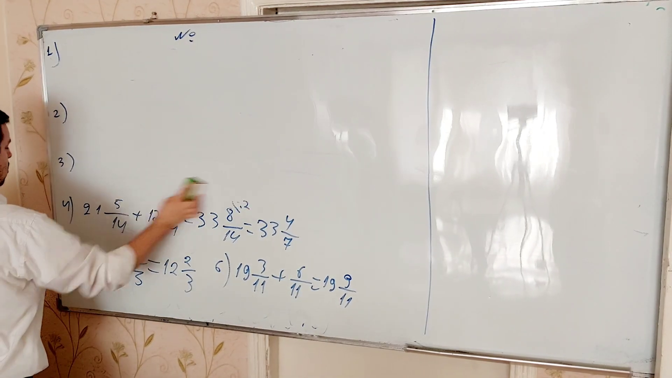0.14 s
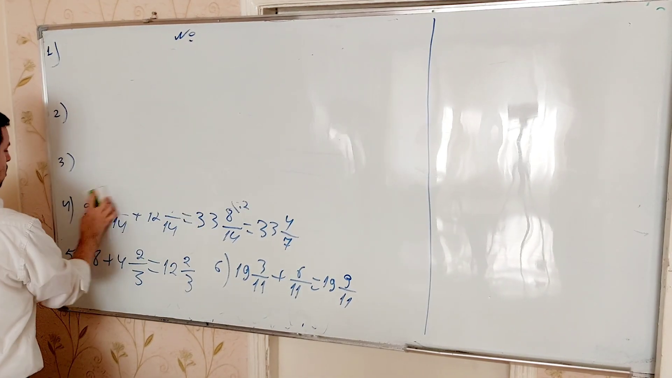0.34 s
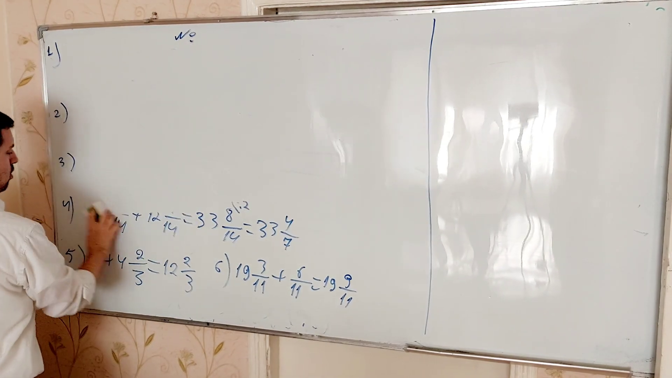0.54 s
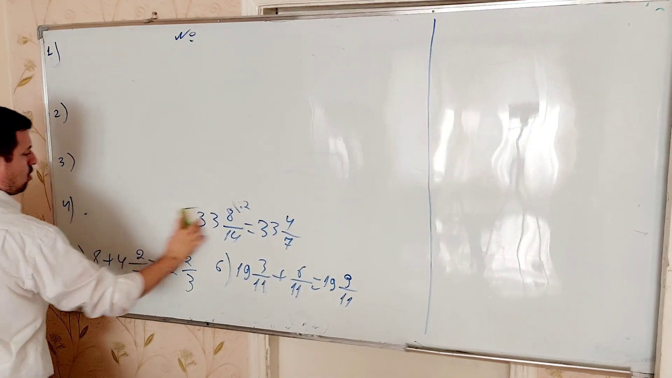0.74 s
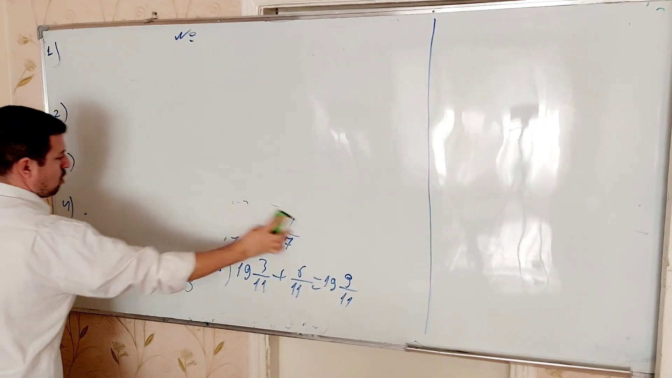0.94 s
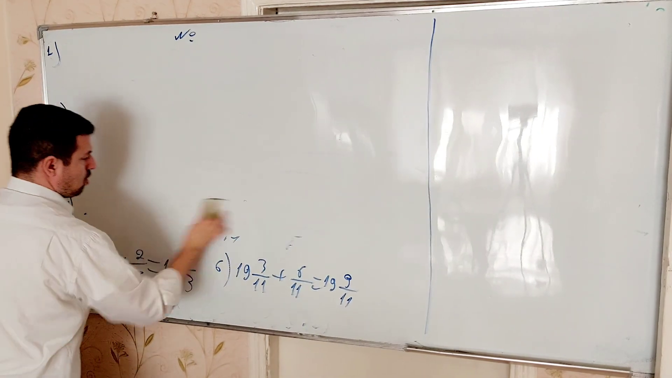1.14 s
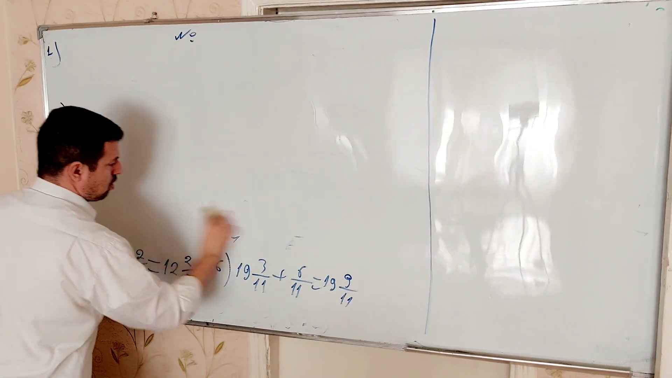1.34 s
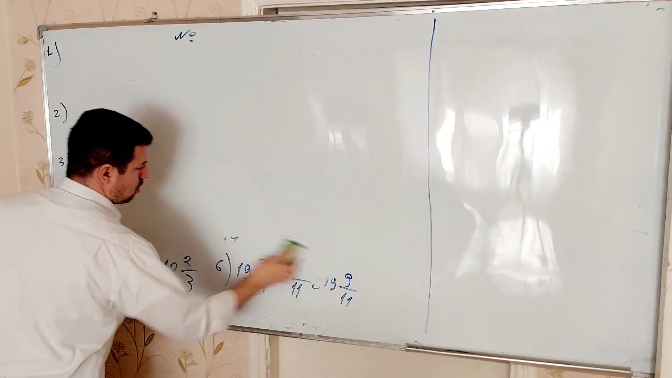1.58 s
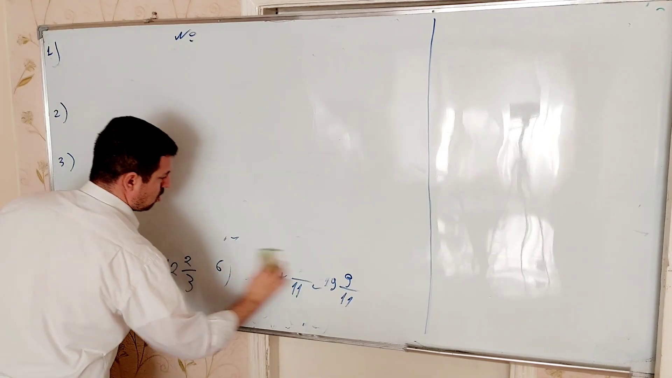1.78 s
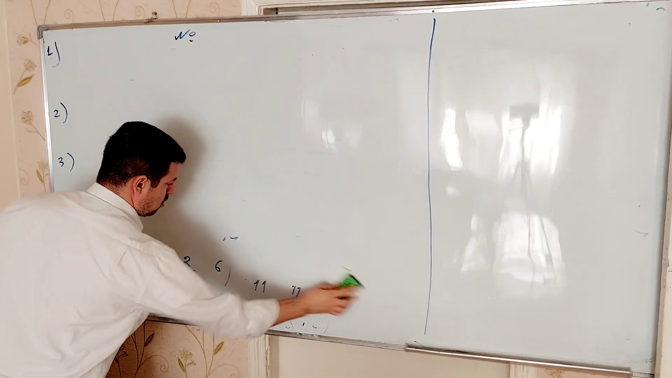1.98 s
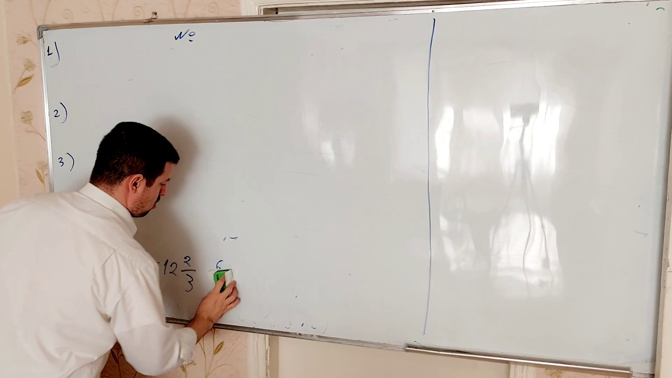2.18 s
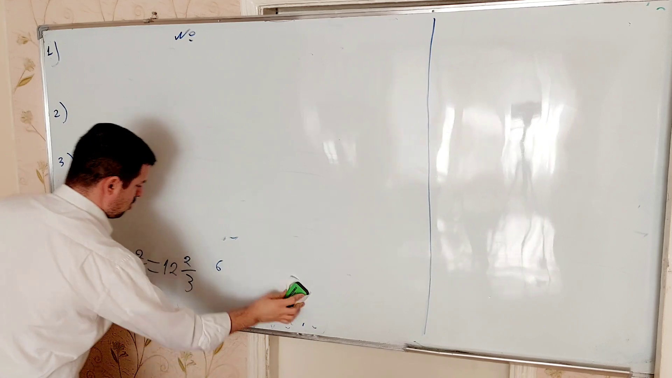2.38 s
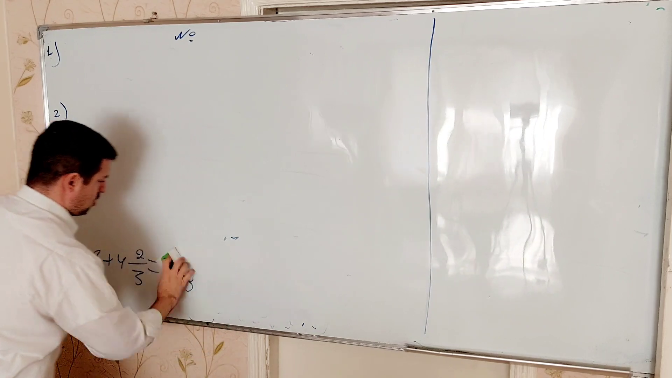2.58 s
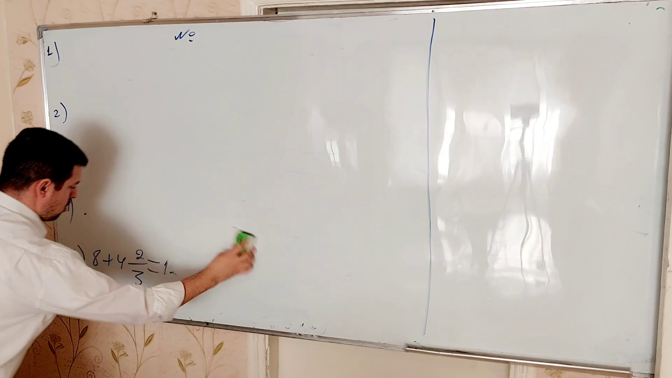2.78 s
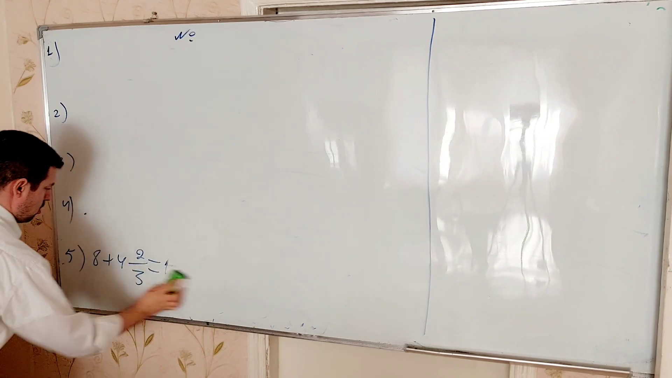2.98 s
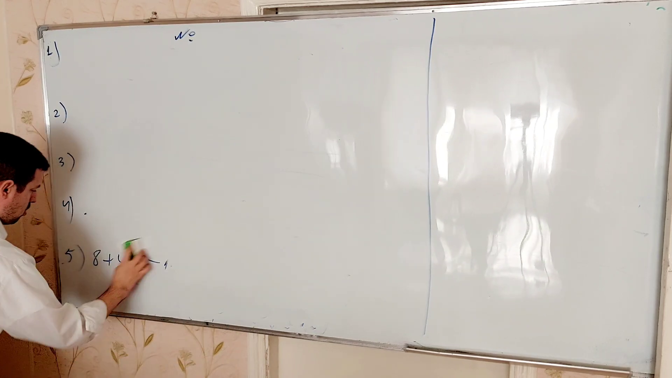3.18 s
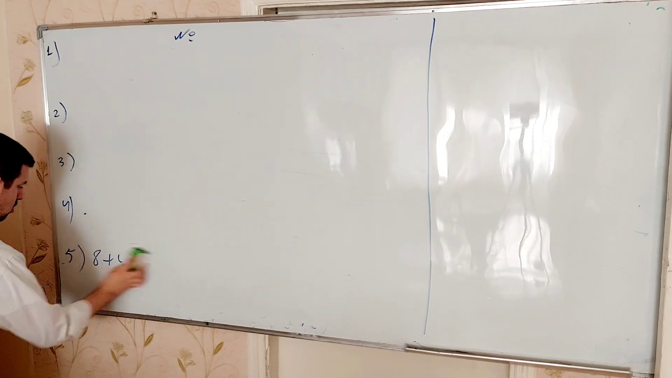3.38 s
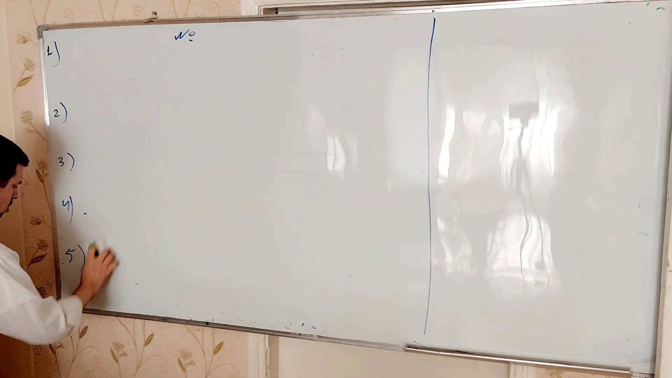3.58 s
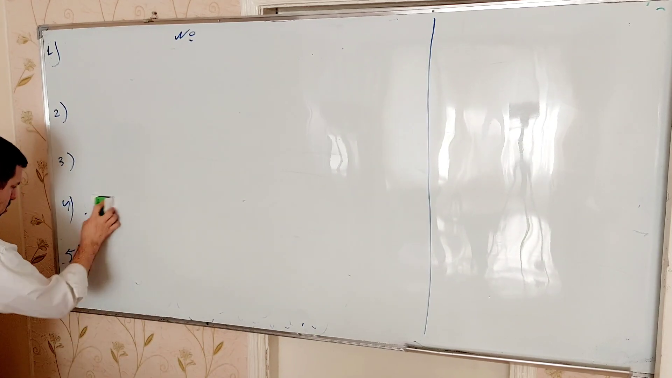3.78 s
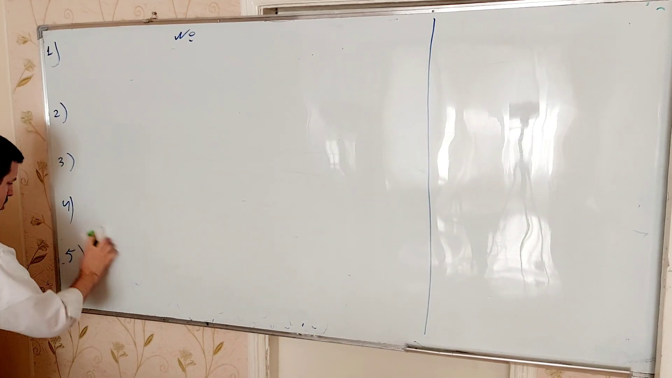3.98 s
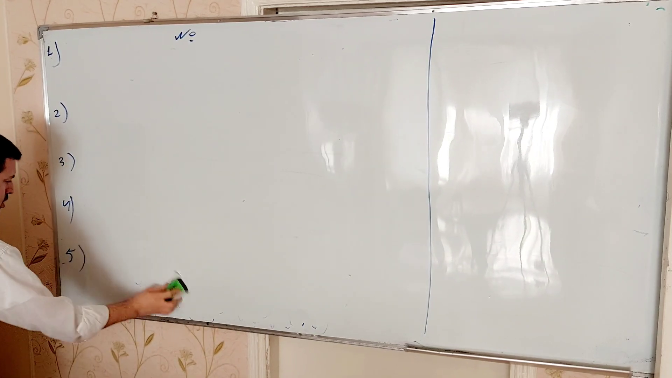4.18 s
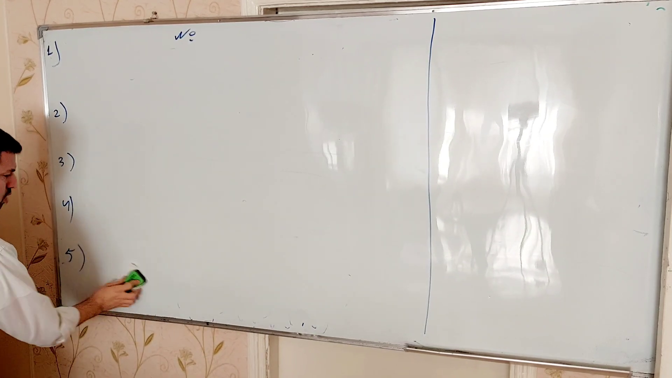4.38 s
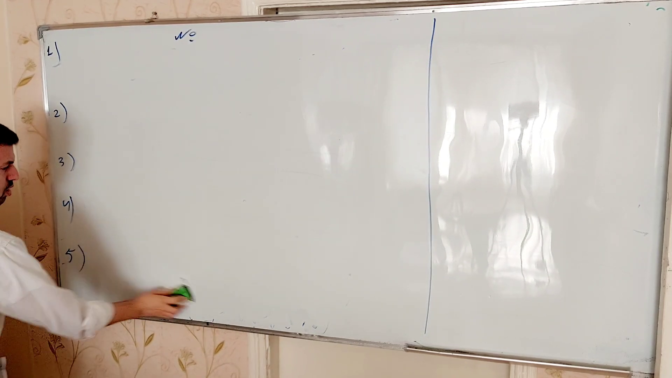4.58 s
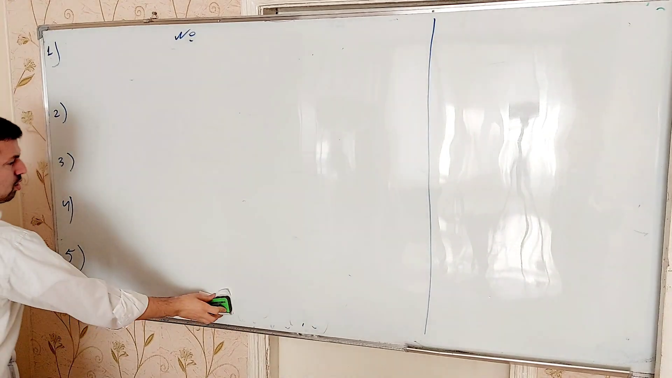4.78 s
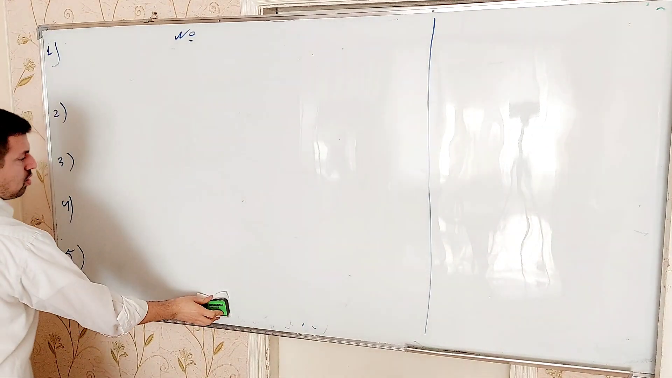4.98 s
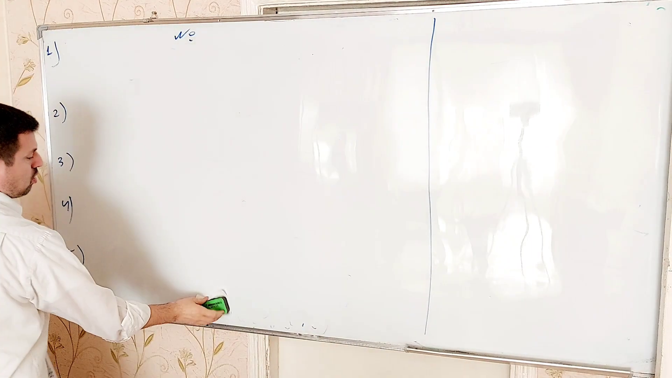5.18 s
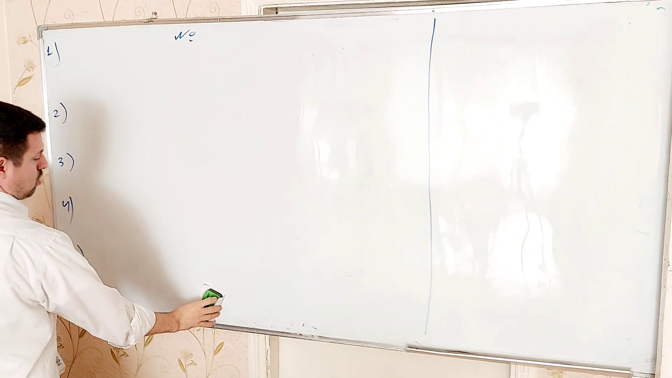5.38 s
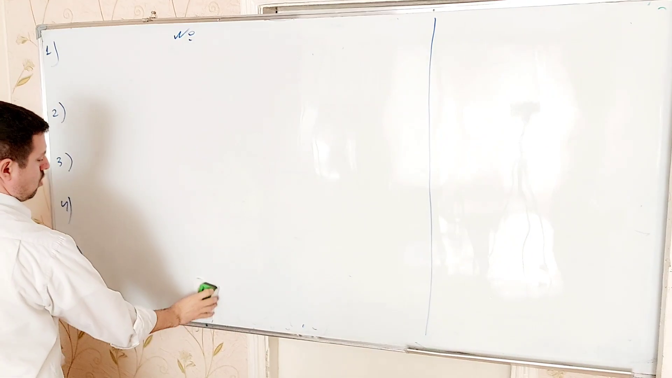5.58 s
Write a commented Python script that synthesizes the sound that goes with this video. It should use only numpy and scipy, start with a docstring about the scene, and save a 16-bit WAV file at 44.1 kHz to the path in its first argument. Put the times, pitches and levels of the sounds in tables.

```python
"""Felt eraser on a whiteboard

A felt eraser is swept to and fro over a thin steel-faced board in a small quiet room.
Filtered noise makes the felt hiss with each stroke. Its uneven drag, sent through the ringing tones
of the loose panel, makes it rumble and rattle in its frame. The turns of the hand knock the panel:
short bursts of the same ringing. A low room hum lies under it all."""
import sys
import numpy as np
from scipy import signal
from scipy.fft import rfft, irfft, next_fast_len
from scipy.io import wavfile
from scipy.ndimage import uniform_filter1d

SR = 44100
rng = np.random.default_rng(int(sys.argv[2]) if len(sys.argv) > 2 else 0)


def store_wav(level_fs):
    """Save 16-bit WAV to argv[1]."""
    pcm = np.round(np.clip(np.atleast_2d(level_fs), -1, 1) * 32767)
    wavfile.write(sys.argv[1], SR, pcm.T.astype(np.int16))


N = 248724
T = np.arange(N) / SR


def amp(db):
    """Turns decibels into a plain multiplier."""
    return 10 ** (np.asarray(db) / 20)


def evened(x):
    """Brings a sound to an average (RMS) strength of 1."""
    return x / np.sqrt(np.mean(x ** 2) + 1e-20)


def read(points, hz):
    """Reads a curve between its points, along a logarithmic pitch scale."""
    point_hz, value = np.transpose(points)
    return np.interp(np.log(hz + 1), np.log(point_hz + 1), value)


def colour(x, points):
    """Filters by a curve of (frequency [Hz], gain [dB])."""
    size = next_fast_len(N + 4096)
    gain = amp(read(points, np.fft.rfftfreq(size, 1 / SR)))
    return irfft(rfft(x, size) * gain, size)[..., :N]


def shaped(spectrum, gain_db):
    """Gives a short-time spectrum a gain that changes over time and pitch, and returns the sound."""
    return signal.istft(spectrum * amp(gain_db), SR, nperseg=256)[1]


def flicker(spread_db, ms):
    """Random level changes that last about ms milliseconds."""
    size = max(round(ms * SR / 1000), 1)
    wander = uniform_filter1d(uniform_filter1d(rng.standard_normal(N), size), size)
    return amp(spread_db * evened(wander))


# How alike left and right are; values outside 0-1 are clipped: (frequency [Hz], likeness)
LIKENESS = [(60, 0.71), (180, 0.88), (550, 0.65), (1650, -1.3), (4970, 0.09), (15000, -0.44)]


def two_ears(x, other, side):
    """Left and right share much of the bass and part ways in the treble; side leans the balance."""
    hz = np.fft.rfftfreq(N, 1 / SR)
    same = np.clip(read(LIKENESS, hz), 0, 1)
    lean = amp(read(side, hz) / 2)
    left, stranger = rfft(x), rfft(other)
    right = same * left + np.sqrt(1 - same ** 2) * stranger
    return irfft([left * lean, right / lean], N)


# Tone colour of the room sound: (frequency [Hz], relative level [dB per Hz])
ROOM_COLOUR = [(13, -45), (22, -4.5), (97, -1.5), (198, -9.5), (247, -2), (372, -15.5), (427, -15.5),
               (578, -24), (740, -18.5), (1690, -23.5), (1880, -24), (3440, -34), (5800, -37), (6900, -31),
               (8290, -27.5), (10000, -33.5), (15600, -39)]
# Balance of the room sound: (frequency [Hz], left minus right [dB])
ROOM_SIDE = [(60, 12), (180, 16), (550, 4.5), (1650, 1.5), (4970, 2), (15000, -0.5)]
ROOM_DB = -69.5


def room():
    """Low hum of the house that swells and sags, under a faint hiss that wavers."""
    noise = rng.standard_normal((2, N))
    low = signal.sosfilt(signal.butter(1, 500., fs=SR, output="sos"), noise)
    noise = (noise - low) * flicker(1.5, ms=45.0) + low * flicker(1.8, ms=40.0)
    return amp(ROOM_DB) * two_ears(*evened(colour(noise, ROOM_COLOUR)), ROOM_SIDE)


# Strokes of felt on enamel:
# (start [s], length [s], hiss level before shaping [dB], fastest moment [0-1 of the length])
STROKES = [(-0.005, 0.48, -61, 0.26), (0.46, 0.38, -62, 0.55), (0.77, 0.22, -62, 0.52),
           (1.008, 0.21, -53.5, 0.56), (1.235, 0.24, -50.5, 0.71), (1.531, 0.082, -51.5, 0.63),
           (1.657, 0.34, -53, 0.68), (2.029, 0.22, -56, 0), (2.25, 0.12, -57, 0.22), (2.4, 0.18, -57, 0.46),
           (2.587, 0.26, -62.5, 0.36), (2.841, 0.38, -59, 0.24), (3.137, 0.18, -63, 0.43),
           (3.303, 0.18, -62.5, 0.47), (3.512, 0.24, -65, 0.45), (3.768, 0.34, -68, 0.33),
           (3.967, 0.24, -61.5, 0.57), (4.262, 0.18, -71, 0.28), (4.47, 0.24, -68.5, 0.3),
           (5.18, 0.18, -80.5, 0.47), (5.483, 0.13, -75, 0.65)]
OVERLAP_S, LINGER_S = 0.011, 0.027  # each stroke is widened at both ends; its hiss lingers
ARCH_POWER = 0.93  # sharpness of the arch


def stroke_db(t):
    """Each stroke speeds up and slows down in one arch; the hiss level follows the speed."""
    coarse_t = T[::64]
    start, length, db, fastest = np.transpose(STROKES)[:, :, None]
    progress = np.clip((coarse_t - start + OVERLAP_S) / (length + 2 * OVERLAP_S), 0, 1)
    # bend the arch so that its top falls on the fastest moment
    bend = np.log(.5) / np.log(np.clip(fastest, .1, .9))
    arch = abs(np.sin(np.pi * progress ** bend)) ** ARCH_POWER
    keep = np.exp(-64 / (SR * LINGER_S))
    power = signal.lfilter([1 - keep], [1, -keep], ((amp(db) * arch) ** 2).sum(0))
    return np.interp(t, coarse_t, 10 * np.log10(power + 1e-10))


# Tone colour of the felt: (frequency [Hz], relative level [dB per Hz])
FELT_COLOUR = [(1060, -35), (1800, -16), (2060, -5), (2700, -6.5), (2930, -4), (3210, -2), (3450, -2.5),
               (4250, 1.5), (6150, -1), (8140, 0), (10100, -6), (12100, -1.5), (15600, -6.5)]
# Balance of the felt: (frequency [Hz], left minus right [dB])
FELT_SIDE = [(2000, 1.5), (5000, 0.5), (9000, 2), (15000, -7)]
# below BODY_HZ the hiss is thinner for strokes lighter than FIRM_DB and fuller for firmer ones
BODY_HZ, BODY_PER_HISS, FIRM_DB = 3780, 0.17, -49  # BODY_PER_HISS in dB per dB
AIR_HZ, AIR_PER_SPEED = 8500, 0.17  # above this the hiss dips deeper at the turns [dB per dB]


def hiss():
    """Fine fibres scrape the enamel: dense, slightly grainy noise, brightest when stroke speed peaks."""
    fibres = rng.standard_normal((2, N))
    fibres = fibres * flicker(0.33, ms=0.49) * flicker(0.75, ms=13.0) * flicker(1.0, ms=45.0)
    felt = two_ears(*evened(colour(fibres, FELT_COLOUR)), FELT_SIDE)
    level_db = np.maximum(stroke_db(T), -90)
    # how far the level stands above its average over a third of a second
    swing_db = level_db - uniform_filter1d(level_db, SR // 3)
    air = colour(felt, [(AIR_HZ * .8, -60), (AIR_HZ, 0)])
    body = colour(felt, [(BODY_HZ * .85, 0), (BODY_HZ, -60)])
    felt = felt + body * (amp(BODY_PER_HISS * (level_db - FIRM_DB)) - 1)
    felt = felt + air * (amp(AIR_PER_SPEED * swing_db) - 1)
    return felt * amp(level_db)


def ring(x, hz, width):
    """One ringing tone (mode) with a gain of about 1 at its centre; a narrow width rings longer."""
    r = np.exp(-np.pi * width / SR)
    return 2 * signal.lfilter([1 - r], [1, -r * np.exp(2j * np.pi * hz / SR)], x).real


# Strong ringing tones of the panel: (frequency [Hz], width [Hz], relative level [dB])
PANEL_MODES = [(67.4, 35, 1), (134.5, 6, 3), (171.3, 4.7, 1.5), (257, 5.6, 4.5), (281.6, 19, 5),
               (358, 31, -10), (401.3, 8.9, -2), (594, 106, 0.5), (695, 33, -5.5), (771, 16, -5.5),
               (861.6, 4.3, -10), (915, 7.1, -9.5), (1200, 84, -21), (1370, 5.9, -26), (1710, 130, -27),
               (1944, 18, -28), (2140, 130, -23), (2780, 870, -18)]
# The many small tones between them: (frequency [Hz], relative level [dB per Hz])
SMALL_MODES = [(15, -33), (25, -32), (106, -9.5), (172, 8), (207, 1), (404, 0.5), (1000, -16.5),
               (15000, -62)]


def panel_colour(force, fill_db):
    """A force on the panel rings its strong tones and the dense small ones between."""
    strong = sum(amp(db) * ring(force, hz, width) / np.sqrt(width) for hz, width, db in PANEL_MODES)
    small = colour(force, SMALL_MODES)
    return evened(strong) + amp(fill_db) * evened(small)


# Drag of the felt on the panel: (time [s], force level [dB], extra level of the middle tones [dB])
DRAG = [(0.0, -47, -24), (0.45, -69, -2.5), (0.652, -67, 3), (0.83, -62.5, -2), (0.96, -47.5, -1),
        (1.19, -48, -10), (1.284, -55.5, -1), (1.45, -49.5, 4), (1.55, -40.5, -2.5), (1.66, -47.5, -2),
        (1.729, -44, 4), (1.8, -48, -4.5), (2.0, -40.5, -8), (2.25, -45, -1.5), (2.58, -47, -14.5),
        (2.68, -59.5, 2), (2.84, -55, -3.5), (3.05, -62.5, -5), (3.21, -67.5, 5), (3.5, -63.5, -8),
        (3.8, -81.5, 1.5), (4.4, -69.5, -1.5), (4.75, -64, -8), (5.1, -76, 3.5), (5.64, -70, -4)]
# Balance of the panel: (frequency [Hz], left minus right [dB])
PANEL_SIDE = [(60, 0), (250, 0), (700, -1.5), (2500, 2), (9000, -9)]
# treble rattle of the frame [dB]: stronger where the hiss is strong for the force [dB per dB]
RATTLE_DB, RATTLE_PER_HISS = -2.5, 0.023


def drag():
    """Felt sticks and slips unevenly and rings the panel; its middle tones and rattle vary."""
    slips = rng.standard_normal((2, N)) * flicker(1.5, ms=8.6) * flicker(2.0, ms=46.0)
    panel = evened(panel_colour(slips, fill_db=2.5))
    hz, t, spectrum = signal.stft(panel, SR, nperseg=256)
    time_s, *columns = np.transpose(DRAG)
    force_db, mid_db = (np.interp(t, time_s, column) for column in columns)
    rattle_db = RATTLE_DB + RATTLE_PER_HISS * (stroke_db(t) - force_db)
    # how much each pitch belongs to the middle tones or to the rattle (0-1)
    mid = read([(250, 0), (650, 1), (1700, 0)], hz)[:, None]
    rattle = read([(650, 0), (1700, 1)], hz)[:, None]
    sound = shaped(spectrum, force_db + mid * mid_db + rattle * rattle_db)
    return two_ears(*sound[:, :N], PANEL_SIDE)


# Knocks and judders of the eraser body: (time [s], level before shaping [dB], centre [Hz],
# spread [octaves], rise [s], judder length before the fade [s])
KNOCKS = [(0.0, -43, 252, 1.4, 0.0015, 0.012), (0.01, -62, 140, 0.38, 0.0091, 0.049),
          (0.192, -61, 410, 0.6, 0.0077, 0.041), (0.298, -50, 242, 0.68, 0.0024, 0.019),
          (0.652, -63, 890, 0.8, 0.006, 0.049), (0.736, -56.5, 280, 0.76, 0.0097, 0.073),
          (0.92, -46.5, 560, 0.5, 0.0047, 0.032), (0.95, -56, 600, 1.44, .008, 0.03),
          (1.028, -48.5, 560, 1.02, 0.0061, 0.033), (1.141, -45, 250, 1.12, 0.0062, 0.021),
          (1.299, -53.5, 450, 1.1, 0.0011, 0.006), (1.323, -53, 400, 1.03, 0.0031, 0.025),
          (1.42, -35, 187, 1.74, 0.014, 0.048), (1.571, -39, 610, 1.37, 0.0006, 0.016),
          (1.805, -41.5, 515, 1.23, 0.0031, 0.098), (1.8605, -42, 1470, 0.65, 0.0008, 0.0076),
          (1.865, -38.5, 700, 1.44, 0.011, 0.089), (1.915, -43, 400, 0.29, 0.0058, 0.026),
          (2.063, -44.5, 478, 1.42, 0.0016, 0.008), (2.146, -43.5, 312, 1.5, 0.0048, 0.011),
          (2.217, -57, 308, 0.42, 0.00099, 0.0036), (2.256, -48.5, 910, 1.21, 0.0082, 0.049),
          (2.268, -57, 746, 0.34, 0.0015, 0.004), (2.287, -40.5, 745, 0.53, 0.0053, 0.029),
          (2.337, -43.5, 320, 1.02, 0.0085, 0.049), (2.435, -56.5, 272, 0.46, 0.00056, 0.0025),
          (2.479, -50.5, 416, 0.97, 0.0056, 0.091), (2.74, -49.5, 188, .8, 0.0058, 0.052),
          (2.881, -49.5, 882, 0.39, 0.00091, 0.0098), (2.895, -56.5, 850, 0.23, 0.001, 0.008),
          (2.882, -63, 1780, 0.31, 0.0023, 0.022), (2.883, -49, 167, 2.29, 0.0039, 0.049),
          (2.903, -55.5, 65.6, 0.83, 0.0093, 0.041), (2.974, -70.5, 1320, 0.85, 0.02, 0.29),
          (3.118, -64, 220, 1.1, 0.006, 0.021), (3.231, -57, 188, 0.54, 0.0077, 0.072),
          (3.402, -59.5, 250, 1, 0.0017, 0.006), (4.148, -55, 527, 0.62, 0.022, 0.057),
          (4.181, -57, 175, 0.67, 0.0097, 0.12), (4.743, -59, 110, 1.06, 0.0068, 0.05),
          (5.058, -76.5, 6500, 1.3, .001, 0.004), (5.563, -76, 2080, 0.15, 0.017, 0.065)]
KNOCK_T60_S = 0.33  # time for a knock to fade by 60 dB
# the panel bounces on its backing while it judders: short pulses with uneven gaps
BOUNCE_DB, BOUNCE_GAP_S, BOUNCE_S = 4.5, 0.017, 0.00085  # strongest level, middle gap, pulse width


def knocks():
    """Each blow shakes the panel against the wall, judders briefly and dies with the room."""
    shake = panel_colour(rng.standard_normal((2, N)) * flicker(0.27, ms=2.3), fill_db=5.0)
    shake = two_ears(*shake, PANEL_SIDE)
    # a smooth curve through the panel's usual spectrum
    hz, power = signal.welch(shake[0], SR, nperseg=1024)
    trend = np.polyfit(np.log(hz + 50), 10 * np.log10(power), 4, w=(hz + 50) ** -.5)
    out = np.zeros((2, N))
    gaps = BOUNCE_GAP_S * rng.uniform(.5, 1.5, (len(KNOCKS), 12))
    for (start, db, centre_hz, spread, rise, hold), gap in zip(KNOCKS, gaps):
        first = max(int(start * SR), 0)
        last = min(int((start + hold + KNOCK_T60_S) * SR), N)
        at = slice(first, last)
        age = T[at] - T[at][0]
        hz = np.fft.rfftfreq(len(age), 1 / SR)
        # a broad band of the panel's tones takes the blow, whatever their usual strength
        band_db = -6 * (np.log2((hz + 20) / centre_hz) / spread) ** 2
        usual_db = np.polyval(trend, np.log(hz + 50))
        judder = evened(irfft(rfft(shake[:, at]) * amp(band_db - usual_db), len(age)))
        # bounces are weaker for knocks centred far from 600 Hz
        lag = (age[:, None] - np.cumsum(gap)) / BOUNCE_S
        bounces = ((1 - lag ** 2) * np.exp(-lag ** 2 / 2)).sum(1)
        bounce_db = BOUNCE_DB - 6.4 * (np.log2(centre_hz / 600) / spread) ** 2
        judder += amp(bounce_db) * bounces
        fade = amp(-60 * np.maximum(age - hold, 0) / KNOCK_T60_S)
        judder *= fade * (1 - np.exp(-age / rise))
        # a sudden contact begins with one damped swing, alike at both ears; a slow rise weakens it
        blow = np.sin(2 * np.pi * centre_hz * age) * np.exp(-age * centre_hz * spread ** 1.1 * 0.83)
        out[:, at] += amp(db) * (judder - 5.5 * np.exp(-rise / 0.003) * blow)
    return out


def scene():
    """All four layers sound together."""
    return room() + hiss() + drag() + knocks()


EDGE_HZ = 15800


def record(dry):
    """A steep filter removes the treble above EDGE_HZ."""
    low_pass = signal.firwin(1023, EDGE_HZ, window=("kaiser", 9), fs=SR)
    return signal.oaconvolve(dry, low_pass[None], "same", axes=1)


dry = scene()
out = record(dry)
store_wav(out)
```